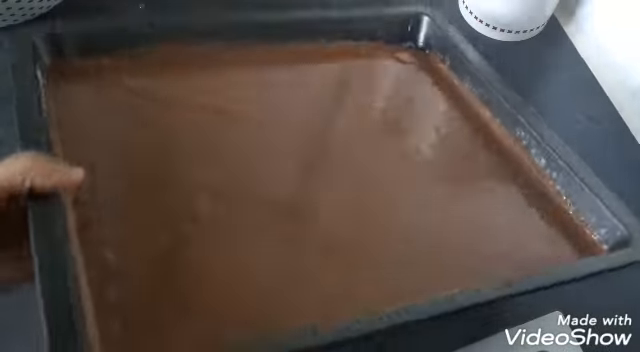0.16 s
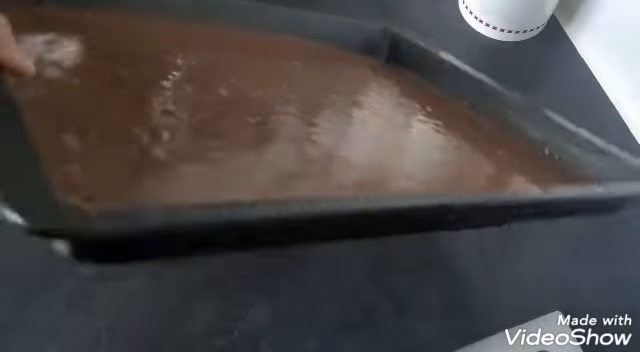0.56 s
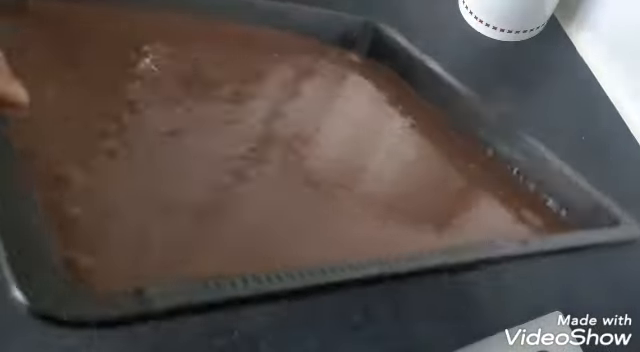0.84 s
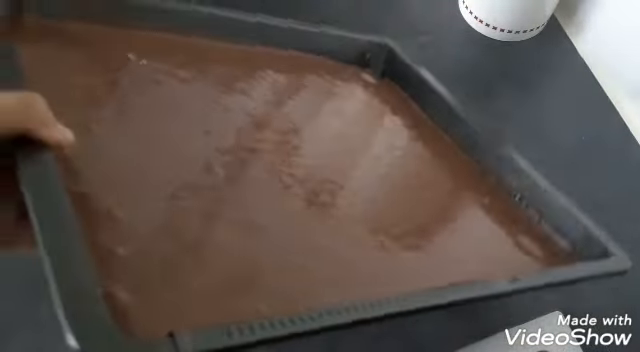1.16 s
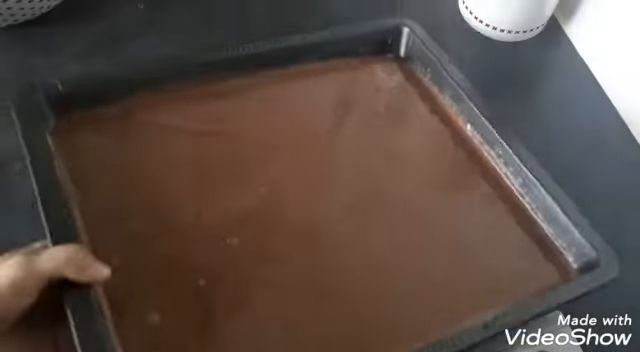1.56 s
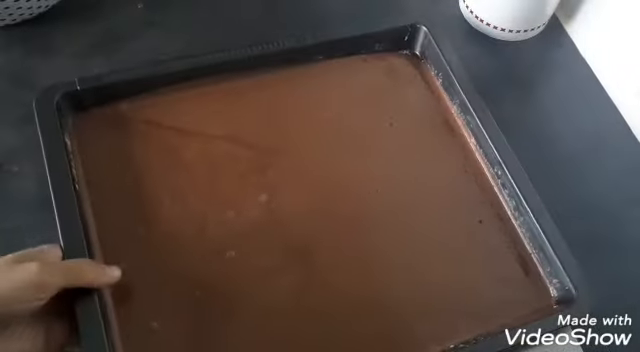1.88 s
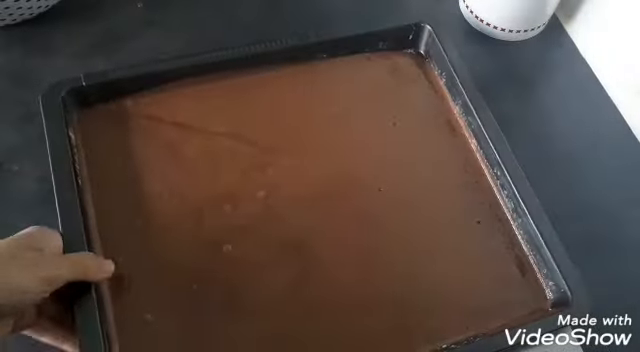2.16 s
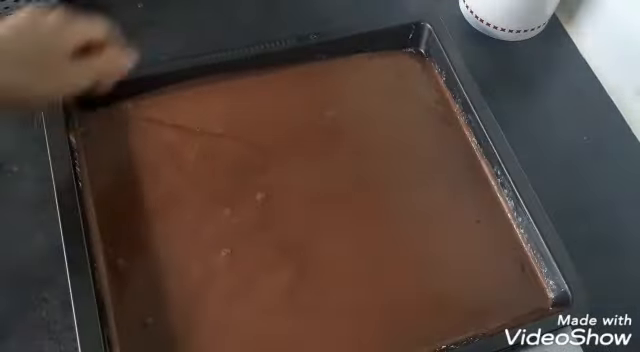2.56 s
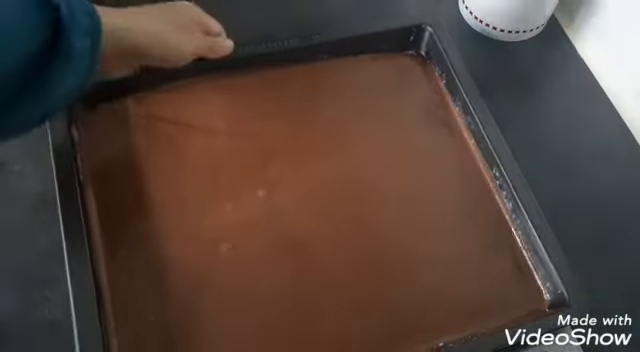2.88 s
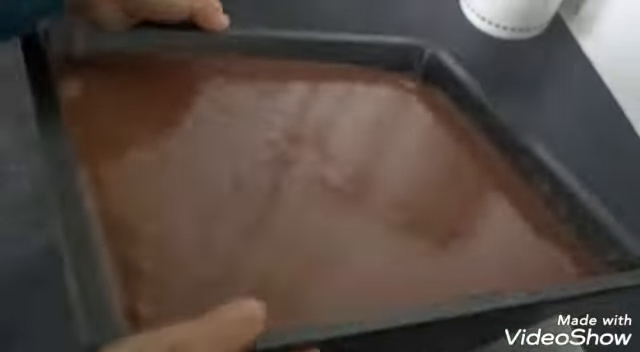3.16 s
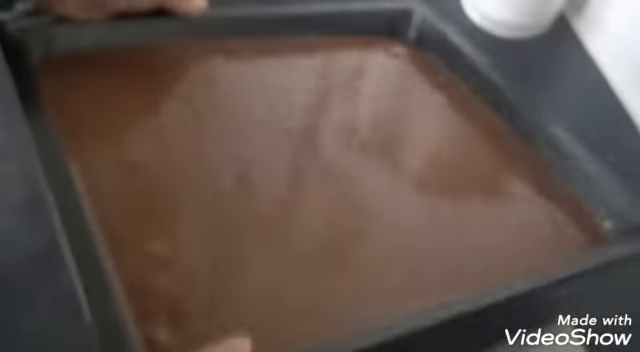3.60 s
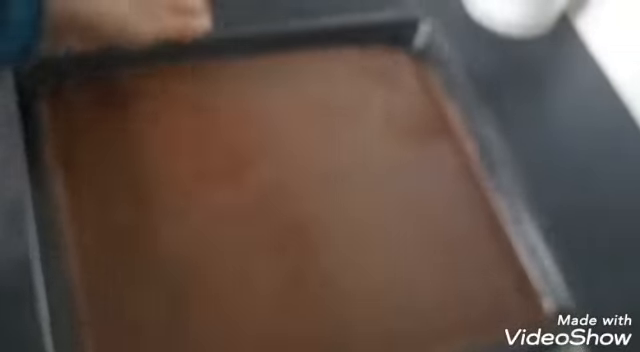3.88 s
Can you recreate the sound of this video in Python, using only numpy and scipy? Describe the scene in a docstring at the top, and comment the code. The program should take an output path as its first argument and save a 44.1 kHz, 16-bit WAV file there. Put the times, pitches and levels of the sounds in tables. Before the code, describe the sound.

Close stereo phone pickup in a small, quiet kitchen with faint low hum. Light finger touches on a metal rim, then two loud dull tray knocks and a clattering landing before one second. Faint settling taps follow, then softer knocks around two seconds, rustling skin and sleeve, and a final loud pair of thuds with rattling bounces.

```python
"""A quiet household hum in a small kitchen, then a rustle of sleeve and fingers at the rim, then the knocks:
a metal tray heavy with batter, tilted, dropped and nudged on a worktop close to a phone's two microphone ports.
Hum, rustle and room are shaped noise; tray and worktop are sums of decaying modes set off by each blow;
rim ticks are short clicks in chattering bursts, and dragging is a run of random jolts ringing the tray."""
import sys
import numpy as np
from scipy import signal
from scipy.io import wavfile
from scipy.ndimage import uniform_filter1d

SR = 44100
rng = np.random.default_rng(int(sys.argv[2]) if len(sys.argv) > 2 else 0)


def file_out(sig):
    """Save sig as 16-bit WAV at sys.argv[1]."""
    # one column per channel
    cols = np.atleast_2d(sig).T
    # limit, then scale
    lim = np.clip(cols, -1, 1)
    pcm = np.round(lim * 32767).astype(np.int16)
    wavfile.write(sys.argv[1], SR, pcm)


N = 178031  # samples
TRAVEL_S = 0.002  # delay from the listed time of a touch, blow or rattle to the microphone


def gain_of(db):
    """Decibels to amplitude gain."""
    return 10 ** (np.asarray(db) / 20)


def evened(x):
    """Scales to rms 1."""
    return x / np.sqrt(np.mean(x ** 2) + 1e-20)


def read(points, hz):
    """Reads a table on a log-frequency axis."""
    f, value = np.transpose(points)
    return np.interp(np.log(hz + 1), np.log(f + 1), value)


def add(mix, s, sound):
    """Mixes a sound in at time s, cut where the mix ends."""
    start = max(round(s * SR), 0)
    part = mix[..., start:][..., :sound.shape[-1]]
    part += sound[..., :part.shape[-1]]


# How alike diffuse sound is at the two ports: f/Hz, likeness [0 to 1]
PORT_LIKENESS = [(100, 0.98), (250, 0.5), (500, 0.54), (1000, 0.033), (2000, 0.0098), (12000, 0.026)]


def diffuse(shape_db, count, size):
    """Sound from all around: two-channel noise from random short-time spectra, coloured by shape_db(hz, t)."""
    hz = np.fft.rfftfreq(size, 1 / SR)[:, None]
    t = np.arange(count * 4 // size + 5) * size / 4 / SR
    a, b, c, d = rng.standard_normal((len(t), len(hz), 4)).T
    same = read(PORT_LIKENESS, hz)
    left = a + 1j * b
    right = same * left + np.sqrt(1 - same ** 2) * (c + 1j * d)
    spectra = np.array([left, right]) * gain_of(shape_db(hz, t))
    return signal.istft(spectra, nperseg=size, noverlap=size * 3 // 4)[1][:, :count]


# Broad household noise, relative spectrum: f/Hz, level/dB per Hz
HOUSE_COLOUR = [(24, -35.5), (40, -3.5), (75, -12.5), (111, -2.5), (139, -23.5), (178, -9), (197, -26),
                (301, -11.5), (496, -25), (620, -23), (703, -30.5), (796, -25), (1680, -25.5), (2160, -38),
                (15400, -59.5)]
# Wavering appliance hum: f/Hz, width/Hz, level/dB
APPLIANCE_HUM = [(108, 10, -71), (314.8, 23, -72.5)]


def house():
    """Broad household noise with narrow noise bands that waver as hums."""
    noise = diffuse(lambda hz, t: read(HOUSE_COLOUR, hz) + 0 * t, count=N, size=2048)
    out = gain_of(-58) * evened(noise)
    for hum_hz, width_hz, db in APPLIANCE_HUM:
        band = lambda hz, t: -10 * np.log10(1 + ((hz - hum_hz) / width_hz * 2) ** 4) + 0 * t
        out += gain_of(db) * evened(diffuse(band, count=N, size=4096))
    return out * gain_of([[.6], [-.6]])  # slightly louder on the left


# Relative spectrum of skin and fabric: f/Hz, level/dB per Hz
CLOTH_COLOUR = [(1470, -4.5), (2500, -11), (3920, -18.5), (8790, -19), (10400, -29.5), (12200, -22.5),
                (14300, -25), (15400, -31)]
# Fingers and sleeve rubbing: loudest t/s, loudest level/dB, swell/dB per s, fade/dB per s
RUSTLES = [(0.439, -68.5, 132, 68), (1.51, -60.5, 147, 59), (1.89, -69, 207, 152), (2.151, -61.5, 153, 122),
           (2.455, -62, 89, 113.5), (2.78, -65.5, 59, 188), (3.57, -59.5, 892.5, 137)]


def rustle():
    """Fine friction hiss of skin and fabric, slightly grainy, swelling and fading."""
    t = np.arange(N) / SR
    grain_db = 0.39 * evened(uniform_filter1d(rng.standard_normal(N), 200))
    level = np.zeros(N)
    for s, db, swell_db, fade_db in RUSTLES:
        level += gain_of(db - np.maximum(swell_db * (s - t), fade_db * (t - s)))
    hiss = evened(diffuse(lambda hz, t: read(CLOTH_COLOUR, hz) + 0 * t, count=N, size=256))
    return hiss * gain_of(grain_db) * level


def ring(modes, rise_s, spot_hz=700, focus_db=0, hard_db=0, flip_hz=1600):
    """Response to one blow, peak 1: the spot favours modes near spot_hz, a hard contact the high ones."""
    hz, db, t60 = np.transpose(modes)[:, :, None]
    t = np.arange(min(round(t60.max() * SR), SR // 2)) / SR
    octaves = np.log2(hz / spot_hz)
    db = db + np.clip(hard_db, -5, 5) * octaves - focus_db * octaves ** 2
    # above flip_hz neighbouring modes start in opposite directions
    sign = (-1.) ** np.cumsum(hz > flip_hz)[:, None]
    partials = sign * gain_of(db - 60 * t / t60) * np.sin(2 * np.pi * hz * t)
    x = partials.sum(0) * (1 - np.exp(-t / rise_s))
    return x / abs(x).max()


# Modes of the batter-damped tray struck at a corner: f/Hz, relative level/dB, t60/s
TRAY_MODES = [(300.6, -19.5, 0.19), (320.4, -13, 0.15), (487, -19.5, 0.052), (551.4, -11.5, 0.088),
              (600, -2, 0.015), (623, -11.5, 0.062), (671, 1, 0.0099), (815, -16, .05), (1037, -8.5, 0.047),
              (1244.6, -1.5, 0.028), (1373, 10.5, 0.011), (1503, 3.5, 0.021), (1790, 7.5, 0.0095),
              (2215, 8.5, 0.007), (2532, -15.5, 0.095), (2770, -72.5, 0.0055), (3320, -53.5, 0.024)]
# Fingertips touching and brushing the rim: t/s, puff level/dB, f/Hz, decay/s, soft bump level/dB
TOUCHES = [(0.343, -71, 5350, 0.014, -90), (0.368, -41.5, 5120, 0.0021, -86),
           (0.453, -95, 5700, 0.007, -51), (3.551, -50, 3440, 0.014, -44), (3.575, -60, 3350, 0.029, -47)]


def touches():
    """Short puffs of friction noise around one pitch, over a soft low bump of the tray."""
    out = np.zeros((2, N))
    t = np.arange(SR // 4) / SR
    for s, db, pitch_hz, decay_s, bump_db in TOUCHES:
        # the finger slides off: a fast decay over a weak slower one
        fade = (1 - np.exp(-t / 0.0021)) * (np.exp(-t / decay_s) + 0.056 * np.exp(-t / 0.026))
        band = lambda hz, frames: -10 * np.log10(0.027 + ((hz - pitch_hz) / 1600) ** 2) + 0 * frames
        puff = evened(diffuse(band, count=len(t), size=256))
        body = ring(TRAY_MODES, rise_s=0.00091, spot_hz=240, focus_db=10)
        bump = signal.fftconvolve(rng.standard_normal(len(t)) * fade, body)
        add(out, s + TRAVEL_S, gain_of(db) * puff * fade)
        add(out, s + TRAVEL_S, gain_of(bump_db) * bump / abs(bump).max())
    return out


# Relative tick colour of the rim: f/Hz, level/dB per Hz
RIM_COLOUR = [(470, -31), (800, -9), (1470, -7), (2240, -8), (3050, -10), (5460, -24.5), (7250, -25),
              (10600, -34.5), (12700, -43.5), (15400, -55.5)]


def tick(bright_db=0):
    """One causal click with the rim's colour, tilted by bright_db per octave (less in the bass), peak 1."""
    hz = abs(np.fft.fftfreq(2048, 1 / SR))
    tilt_db = bright_db * np.log2(hz / 2000 + .1)
    log_gain = np.log(gain_of(read(RIM_COLOUR, hz) + tilt_db))
    # minimum phase puts the energy at the very start
    x = np.fft.ifft(np.exp(np.conj(signal.hilbert(log_gain)))).real[:1024]
    return x / abs(x).max()


def chatter(db, decay_s, click):
    """A burst of tiny rim contacts, and the single click of equal energy that the walls blur it into."""
    t = np.arange(SR // 5) / SR
    hits = rng.random(len(t)) < 4000 / SR  # 4000 contacts per second on average
    contacts = 0.6 * rng.standard_normal(len(t)) * hits * np.exp(-t / decay_s)
    contacts[0] = 1
    burst = gain_of(db) * signal.fftconvolve(contacts, click)
    blurred = gain_of(db) * np.linalg.norm(contacts) * click
    return burst, blurred


# Decay of the kitchen's answer: f/Hz, t60/s
ROOM_T60 = [(100, 1), (300, 0.12), (700, 0.32), (1800, 0.36), (4800, 0.3), (12000, 0.17)]
# Relative colour of the kitchen's answer: f/Hz, level/dB
ROOM_COLOUR = [(100, -10.6), (300, -5.5), (600, -1.5), (1500, -9), (4000, -1.5), (7000, -2.5), (12000, -2)]


def room(x, wet_db):
    """Diffuse answer of the kitchen, each band dying at its own speed."""
    decay = lambda hz, t: read(ROOM_COLOUR, hz) - 60 * t / read(ROOM_T60, hz)
    tail = diffuse(decay, count=SR // 2, size=256)
    # the first walls answer late
    tail = tail * np.clip((np.arange(SR // 2) / SR - .002) / 0.0011, 0, 1)
    tail = tail / np.sqrt((tail ** 2).sum() / 2)
    return gain_of(wet_db) * signal.fftconvolve(x[None], tail, axes=1)


SHADOW_HZ = 420  # well below this the phone casts no shadow and both ports hear alike
BOUNCE_S, BOUNCE_DB = 0.000473, -12.5  # worktop bounce at the right port, after and below its direct sound
LEFT_DELAY_S = 0.00005


def placed(x, pan_db):
    """Direct sound at the two ports: shared bass, upper range pan_db louder on the left."""
    highpass = signal.butter(1, SHADOW_HZ, "high", fs=SR, output="sos")
    upper = signal.sosfilt(highpass, x)
    left, right = np.zeros(len(x)), upper.copy()
    add(left, LEFT_DELAY_S, upper)
    steps = np.arange(len(x))
    right += gain_of(BOUNCE_DB) * np.interp(steps - BOUNCE_S * SR, steps, upper, left=0)
    return x - upper + np.array([left * gain_of(pan_db / 2), right * gain_of(-pan_db / 2)])


def blow(knock, click, rim_db, chatter_s, boom, pan_db, wet_db):
    """One blow at the ports: tray knock, rim chatter, worktop boom and the room's answer to knock and rim."""
    direct, blurred = chatter(rim_db, chatter_s, click)
    to_walls = knock.copy()
    add(direct, 0, knock)
    add(to_walls, 0, blurred)
    out = room(to_walls, wet_db)
    add(out, 0, placed(direct, pan_db))
    add(out, 0, boom)
    return out


# Modes of the worktop: f/Hz, relative level/dB, t60/s
WORKTOP_MODES = [(88, -3.5, 0.25), (116.85, -2.5, 0.45), (160.8, 0, 0.2), (213, -5, 0.1), (299.6, 0, 0.13),
                 (341.9, 7.5, 0.18)]


def worktop_boom(db, boom_hz):
    """Low boom of the worktop, its modes near boom_hz favoured."""
    return gain_of(db) * ring(WORKTOP_MODES, rise_s=0.002, spot_hz=boom_hz, focus_db=12, flip_hz=100)


# A corner of the tilted tray knocks the worktop:
# t/s, tray level/dB, favoured tray f/Hz, hardness/dB per octave
KNOCKS = [(0.596, -7.5, 580, -1), (0.668, -8, 594, -0.5), (2.037, -18, 630, -1.5), (2.109, -35, 556, 0),
          (2.237, -16.5, 545, -1.5), (2.819, -7, 560, -1.5), (2.933, -8.5, 570, 1.5)]
KNOCK_RIM_DB, KNOCK_BOOM_DB = -16.5, -24.5  # relative to the knock, rim at hardness 0
RIM_PER_HARD = 2.1  # a harder knock ticks louder: dB per dB of hardness


def knocks():
    """Corner knocks: dull tray modes around one favoured pitch, with rim ticks and a worktop boom."""
    out, click = np.zeros((2, N)), tick(bright_db=0.2)
    for s, db, spot_hz, hard_db in KNOCKS:
        knock = gain_of(db) * ring(TRAY_MODES, 0.0022, spot_hz, focus_db=3.5, hard_db=hard_db)
        boom = worktop_boom(db + KNOCK_BOOM_DB, boom_hz=130)
        rim_db = db + KNOCK_RIM_DB + RIM_PER_HARD * hard_db
        add(out, s + TRAVEL_S, blow(knock, click, rim_db, 0.0039, boom, pan_db=5.5, wet_db=-1.5))
    return out


# The base slaps down and bounces: t/s, tray level/dB, hardness/dB per octave (limited to +-5 in use),
# rim tick level/dB, chatter decay/s, worktop boom level/dB, favoured boom f/Hz
LANDINGS = [(0.827, -11, -2, -16.5, 0.0021, -36, 121), (0.878, -20, -7, -20.5, 0.0045, -26, 127),
            (0.929, -33.5, 2, -16.5, 0.0019, -41, 118), (0.949, -19.5, 0, -41, 0.0023, -32.5, 125),
            (0.9694, -32.5, 6, -36, 0.0009, -29, 125), (1.284, -36, -9, -51.5, 0.01, -45, 151),
            (1.314, -36, -17, -34.5, 0.012, -28, 132), (1.336, -31.5, 5, -60, 0.0035, -26.5, 143),
            (1.3907, -44, -7, -45, 0.002, -37.5, 125), (1.416, -39, 5, -43.5, 0.0076, -47, 136),
            (1.461, -49, -8, -44.5, 0.0058, -41.5, 134.5), (1.969, -28.5, 0.5, -35.5, .006, -33, 133),
            (3.082, -20, -6.5, -21, 0.012, -16.5, 135), (3.0915, -33, 8, -17.5, 0.0024, -21, 135),
            (3.1056, -42, 5.5, -28, 0.01, -17.5, 145), (3.187, -22.5, 8.5, -21.5, 0.0018, -26.5, 132.6),
            (3.229, -33.5, -6.5, -32.5, 0.0027, -27, 170), (3.278, -32.5, 9, -39.5, .005, -30.5, 139)]


def landings():
    """Flat landings: no tray pitch is favoured by a struck spot, and the room answers more strongly."""
    out, click = np.zeros((2, N)), tick(bright_db=-0.56)
    for s, db, hard_db, rim_db, chatter_s, boom_db, boom_hz in LANDINGS:
        knock = gain_of(db) * ring(TRAY_MODES, rise_s=0.0013, hard_db=hard_db)
        boom = worktop_boom(boom_db, boom_hz)
        add(out, s + TRAVEL_S, blow(knock, click, rim_db, chatter_s, boom, pan_db=5.5, wet_db=2.5))
    return out


# The tray base drags on the worktop: start t/s, loudest t/s, end t/s,
# loudest level/dB, favoured tray f/Hz, focus/dB per octave squared
DRAGS = [(0.833, 0.842, 0.93, -27, 900, 1.5), (1.839, 1.893, 2, -57.5, 306, 16),
         (2.113, 2.141, 2.178, -36, 555, 7.5), (2.942, 2.955, 3, -23, 650, 13)]
DRAG_START_DB, DRAG_END_DB = -3, -21.5  # relative to the loudest moment


def drag():
    """Stick-slip jolts of uneven size ring the tray while its base slides."""
    x = np.zeros(N)
    for start, loudest, end, db, spot_hz, focus_db in DRAGS:
        count = SR // 4
        t = start + np.arange(count) / SR
        size, when, sign = rng.random((count, 3)).T
        slips = (.3 + size) * (when < 1500 / SR) * np.sign(sign - .5)  # 1500 per second on average
        level_db = db + np.interp(t, [start, loudest, end], [DRAG_START_DB, 0, DRAG_END_DB])
        slips = evened(slips) * gain_of(level_db) * (t < end)
        body = ring(TRAY_MODES, 0.0032, spot_hz, focus_db)
        add(x, start, signal.fftconvolve(slips, body / np.linalg.norm(body)))
    return placed(x, pan_db=5.8) + room(x, wet_db=-5)[:, :N]


# The loose rim rattles between blows: t/s, first contact level/dB
RATTLES = [(0.8591, -23), (0.893, -24), (1.9631, -36), (2.9483, -22), (3.0047, -35.5), (3.03, -33.5),
           (3.12, -50), (3.138, -30), (3.2061, -29), (3.291, -55)]


def rattles():
    """Chattering rim contacts too light to ring the tray."""
    out, click = np.zeros((2, N)), tick()
    for s, db in RATTLES:
        close, blurred = chatter(db, 0.003, click)
        add(out, s + TRAVEL_S, placed(close, pan_db=0.81))
        add(out, s + TRAVEL_S, room(blurred, wet_db=-0.5))
    return out


def scene():
    """All sources at the microphone ports."""
    return house() + rustle() + touches() + knocks() + landings() + drag() + rattles()


MIC_HZ, EDGE_HZ = 65.6, 15500  # bass edge of the microphone, upper band limit


def record(dry):
    """Bass roll-off of the small microphone, then the band limit."""
    highpass = signal.butter(2, MIC_HZ, "high", fs=SR, output="sos")
    thin = signal.sosfilt(highpass, dry)
    lowpass = signal.firwin(511, EDGE_HZ, window=("kaiser", 9), fs=SR)
    return signal.oaconvolve(thin, lowpass[None], "same")


dry = scene()
out = record(dry)
file_out(out)
```